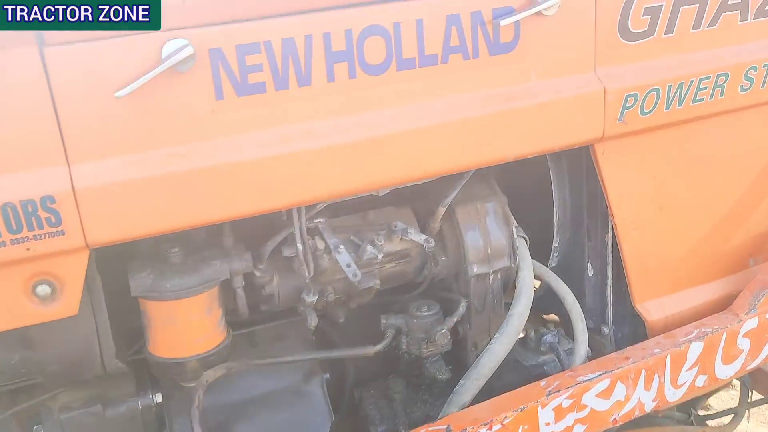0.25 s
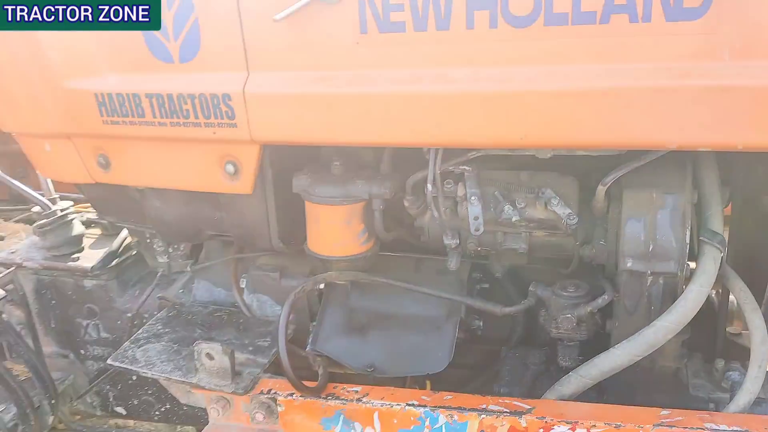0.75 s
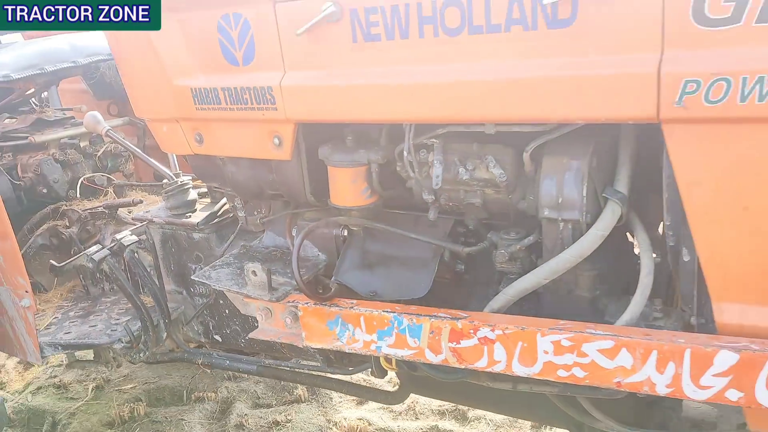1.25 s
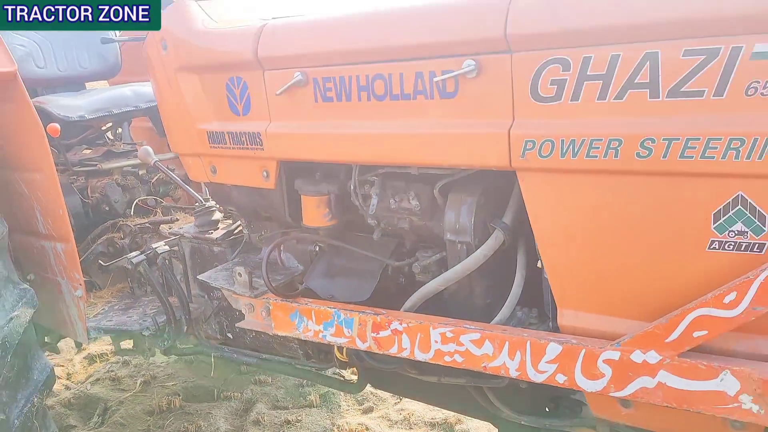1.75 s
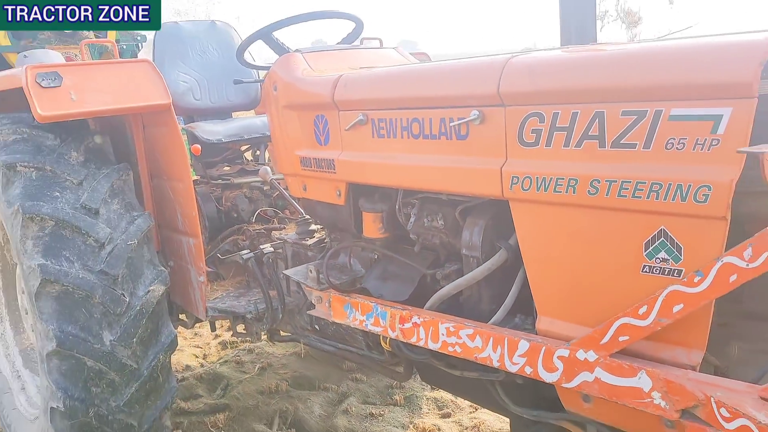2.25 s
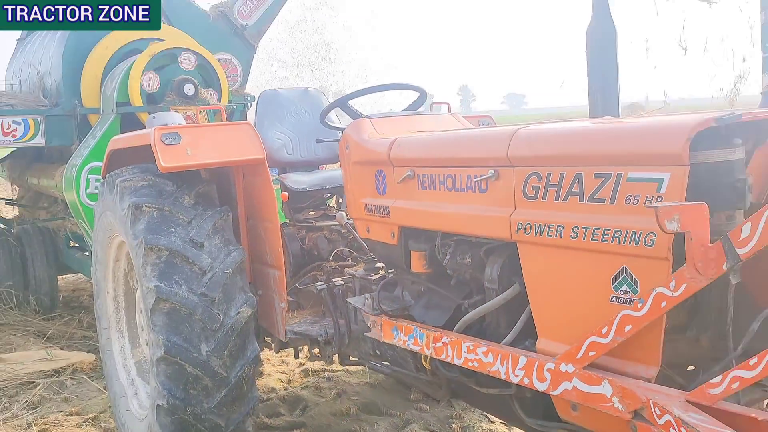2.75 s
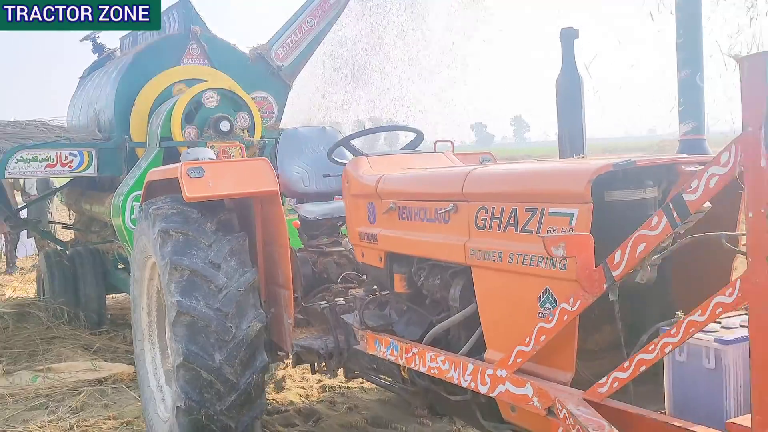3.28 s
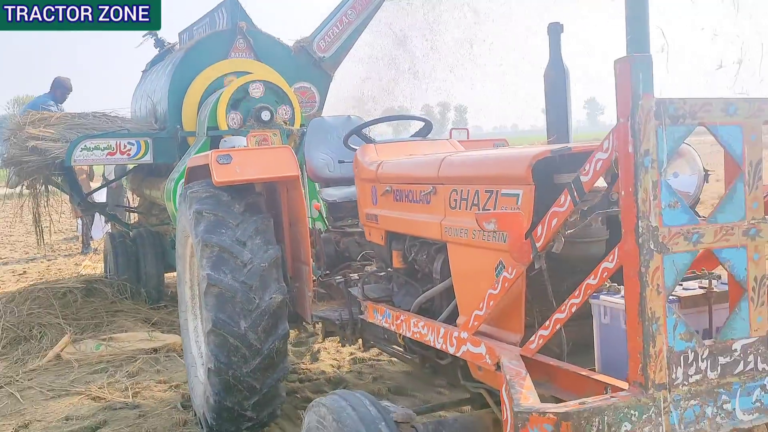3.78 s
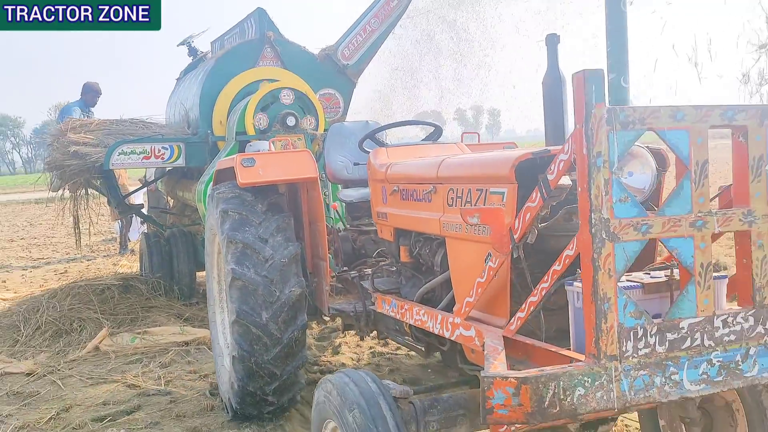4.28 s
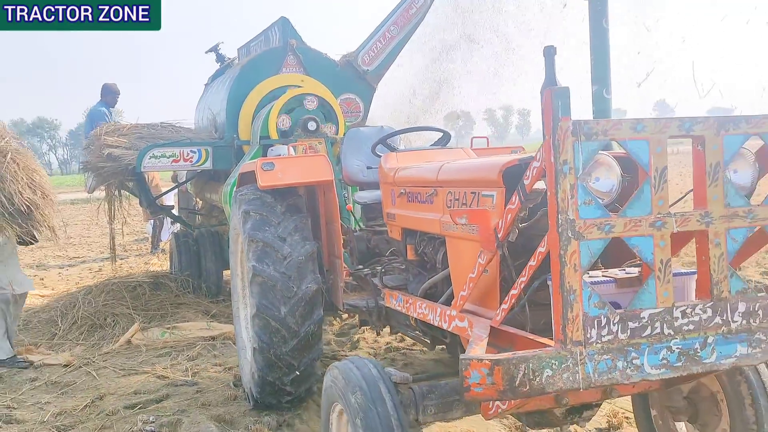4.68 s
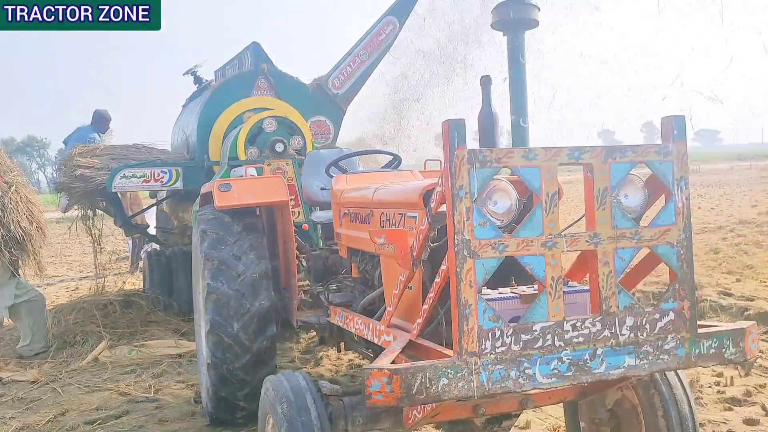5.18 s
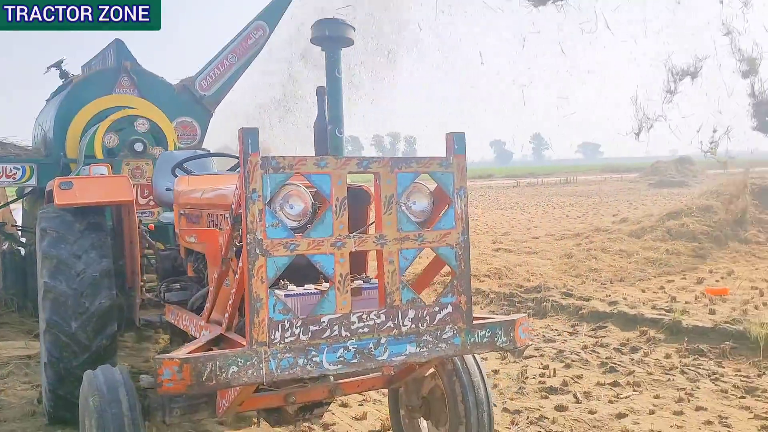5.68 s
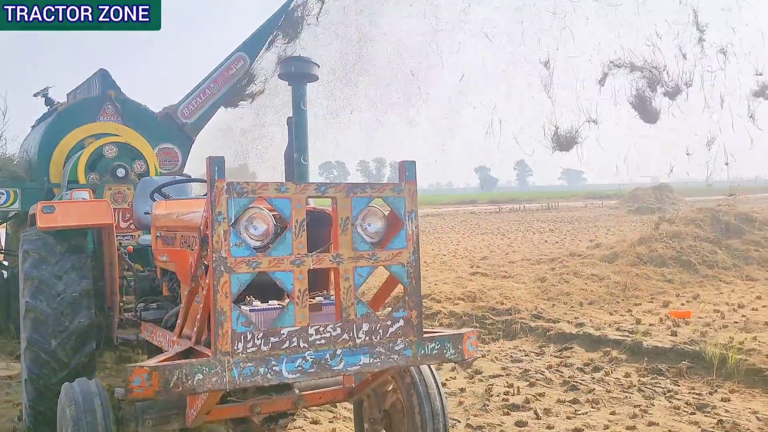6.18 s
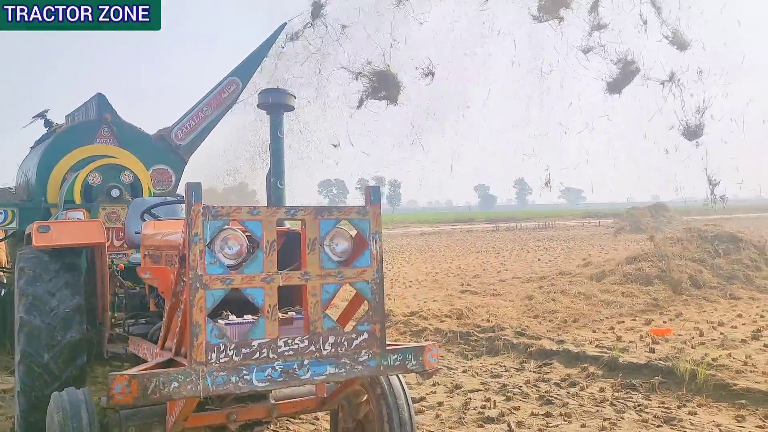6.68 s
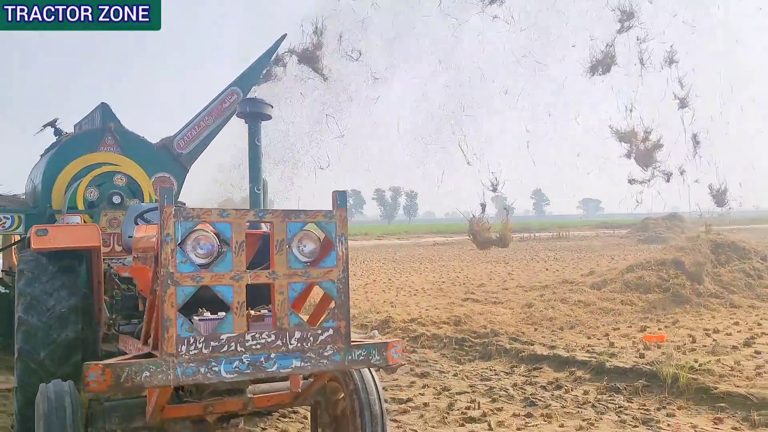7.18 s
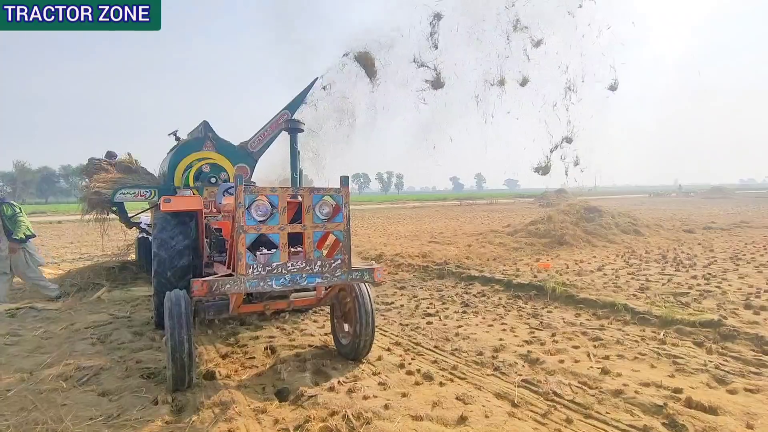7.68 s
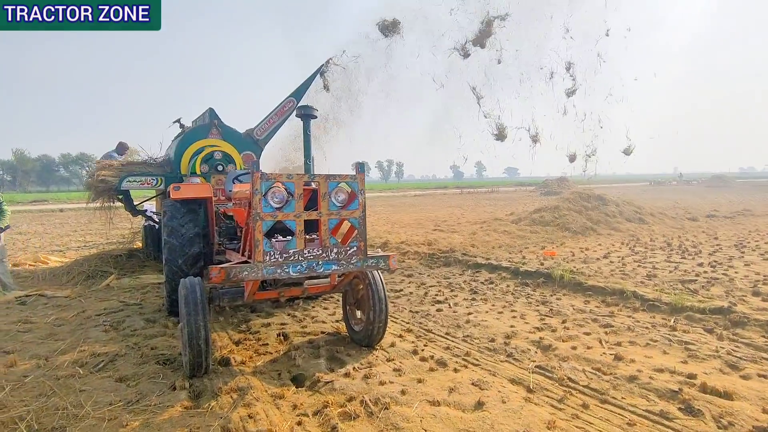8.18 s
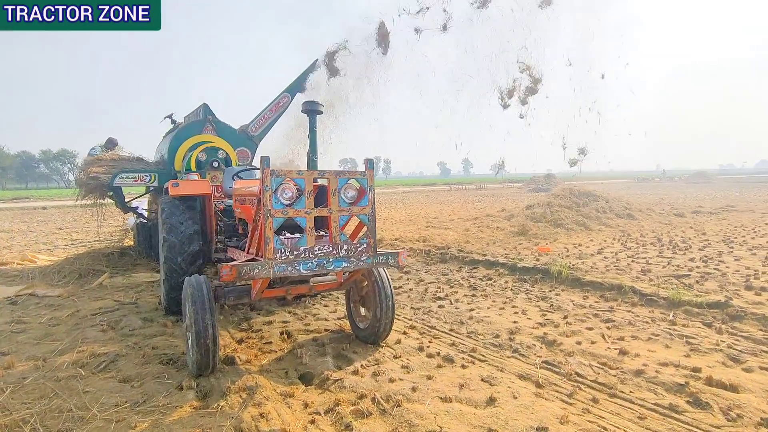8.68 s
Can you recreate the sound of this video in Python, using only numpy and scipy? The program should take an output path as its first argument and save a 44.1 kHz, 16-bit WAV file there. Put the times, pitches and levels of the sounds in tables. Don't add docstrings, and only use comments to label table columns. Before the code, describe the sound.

From 0 s a tractor diesel runs at full work, very close to the two-port microphone: a dense throb of about 59 firings a second, with block knock, rattling valve gear and crisp injector ticking. Behind it a belt-driven thresher gives a patchy, broadband rush of straw and air with a steady blower hum. Over 0.5-2.6 s the listener steps back along the side and the near engine tone changes; small dips come near 2.2 and 3.35 s. Around 4.1 s the engine bites harder and begins to labour. From 5 to 7 s, rounding the front, pitch drops to about 52, treble dulls, bonnet ringing increases and stray hard knocks stand out. It falters near 7.4 s, surges at 8.5 s with brighter ticking and a short low gust, and continues near 50 to the end at 8.9 s. Faint wind, open field, no evident echo.

```python
import sys
import numpy as np
from scipy import signal
from scipy.fft import rfft, irfft, next_fast_len
from scipy.io import wavfile
from scipy.ndimage import uniform_filter1d, map_coordinates

SR = 44100
rng = np.random.default_rng(int(sys.argv[2]) if len(sys.argv) > 2 else 0)


def decibels_to_gain(level_db):
    exponent = np.asarray(level_db, float) / 20
    return 10 ** exponent


def bounce(signal):
    frames = np.transpose(np.atleast_2d(signal))
    limited = np.clip(frames, -1, 1)
    pcm = np.round(limited * 32767).astype(np.int16)
    wavfile.write(sys.argv[1], SR, pcm)


N = 394254
T = np.arange(N) / SR


def along(points, hz):
    f, v = np.transpose(points)
    return np.interp(np.log(hz + 1), np.log(f + 1), v)


def curves(rows, t=T):
    s, *columns = np.transpose(rows)
    return [np.interp(t, s, column) for column in columns]


def bumps(rows):
    return sum(db * np.exp(-((T - s) / half_s) ** 2) for s, db, half_s in rows)


def unit(x):
    return x / np.sqrt(np.mean(x ** 2) + 1e-20)


def wobble(rate):
    coarse = np.arange(0, N + 64, 64)
    knots = rng.standard_normal(int(N * rate / SR) + 4)
    return np.interp(np.arange(N), coarse, map_coordinates(knots, [coarse * rate / SR]))


def filtered(x, response):
    m = next_fast_len(N + 8192)
    return irfft(rfft(x, m) * response(np.fft.rfftfreq(m, 1 / SR)), m)[..., :N]


def ringing(x, modes):
    def body(hz):
        total = 0
        for k, (centre, width, db) in enumerate(modes):
            damping = 1j * hz * width
            total = total + (-1) ** k * decibels_to_gain(db) * damping / (centre * centre - hz * hz + damping)
        return total
    return unit(filtered(x, body))


# time in seconds, left port lag in ms, ports alike up to this
# frequency in Hz, frontness 0-1, blur of the nearby moving parts (a factor, larger when close).
LISTENER_PATH = [(0, 0.11, 680, 0.7, 4.9), (.4, 0.047, 940, .2, 4.9), (.7, -0.11, 1120, 0.2, 3.1),
                 (1.5, -0.1, 1310, .05, 2.3), (2.4, -0.12, 1540, 0, 1.8), (3.6, -0.095, 2140, 0, 1.5),
                 (4.8, -0.1, 2420, 0, 0.77), (5.5, 0.071, 2600, 0.1, 0.57), (6.2, 0.043, 2840, 0.83, 0.7),
                 (7.3, 0.071, 3020, 0.34, 0.68), (8.94, 0.067, 3120, 0.6, 0.49)]


def walk(t=T):
    return curves(LISTENER_PATH, t)


PLACE_TIMES = [.8, 2.8, 4.6, 6.6]


def at_places(levels_db):
    return np.interp(T, PLACE_TIMES, levels_db)


# time in seconds, firing rate in Hz.
FIRING_RATE = [(0.0, 59.09), (0.5, 58.17), (1.05, 57.53), (1.7, 57.85), (2.1, 58.35), (2.5, 57.96),
               (3.2, 58.02), (3.85, 58.44), (4.55, 55.87), (4.9, 55.46), (5.3, 55.39), (5.6, 54.9),
               (5.95, 52.96), (6.3, 52.17), (6.65, 52.03), (7.1, 51.07), (8.4, 50.4), (8.94, 50.01)]


def firing_rate():
    return curves(FIRING_RATE)[0]


def firings():
    return np.cumsum(firing_rate()) / SR + 3 - .13


# time in seconds, effort in dB.
GOVERNOR = [(0, 2), (.35, 0), (.8, -1), (2.3, -.7), (2.6, .6), (3.3, .8), (4.0, 1.5), (4.15, 4.2),
            (4.8, 4.3), (5.5, 3.5), (6.3, 5), (6.9, 3.3), (7.8, 3.6), (8.94, 3.5)]


def effort():
    return curves(GOVERNOR)[0]


# time in seconds, change in dB, half length in seconds.
FEED_LURCHES = [(.85, -0.5, 0.083), (2.2, -1.5, .04), (3.35, -2.5, 0.025), (3.97, -0.5, .04),
                (4.15, 1, .05), (5.6, -2, 0.014), (6.2, -1.5, 0.018), (6.85, -1.5, 0.098),
                (7.1, 0.5, 0.039), (7.42, -2.5, .05), (8.17, -1, 0.052), (8.48, 2, 0.056), (8.6, -1, 0.038)]


def lurches():
    return bumps(FEED_LURCHES)


# frequency in Hz, level in dB.
LOW_TURBULENCE = [(12, -29), (22, -7.5), (32, -12.5), (55, 0), (90, -3), (160, -2.5), (230, -6.5),
                  (320, -9), (450, -21.5), (800, -55.5)]


def turbulence():
    return unit(filtered(rng.standard_normal((2, N)), lambda hz: decibels_to_gain(along(LOW_TURBULENCE, hz))))


def wind():
    return decibels_to_gain(-38 + 1.5 * wobble(3)) * turbulence()


# frequency in Hz, density in dB per Hz.
RUSH_SPECTRUM = [(150, -33), (300, -5), (500, -15), (750, -8), (1100, -11.5), (1500, -12), (2550, -15),
                 (3400, -18.5), (4800, -21), (5600, -18), (7000, -13.5), (8000, -22), (9000, -59)]
# time in seconds, rise in dB, half length in seconds.
RUMBLE_GUSTS = [
    (6.15, -1.5, 0.34),
    (7.4, 0.5, .2),
    (8.57, 7, .08),
    (8.9, 0.5, 0.14),
]


def thresher():
    z = signal.stft(rng.standard_normal((2, N)), nperseg=512)[2]
    field = uniform_filter1d(rng.standard_normal(z.shape[1:]), size=6, axis=0)
    field = uniform_filter1d(field, size=12, axis=1)
    patchy = signal.istft(z * decibels_to_gain(2.0 * unit(field)), nperseg=512)[1][:, :N]
    rush = unit(filtered(patchy, lambda hz: decibels_to_gain(along(RUSH_SPECTRUM, hz))))
    rumble_db = -28 + bumps(RUMBLE_GUSTS) + 1.5 * wobble(6)
    return decibels_to_gain(-28 + .6 * wobble(2)) * rush + decibels_to_gain(rumble_db) * turbulence()


# multiple of the firing rate, then level in dB heard at each of the four places.
BLADE_TONES = [(1.165, -46, -39, -41, -43), (2.863, -37, -30, -30, -33), (3.7, -44, -38, -39, -40),
               (5.726, -46, -44, -40, -44)]


def blower():
    turn, out = 2 * np.pi * firings(), np.zeros(N)
    for multiple, *db in BLADE_TONES:
        level = np.sqrt(2) * decibels_to_gain(at_places(db) + wobble(6))
        out += level * np.cos(multiple * turn + .1 * wobble(5))
    return out


# time in seconds, closeness 0-1.
CLOSENESS = [
    (.45, 1),
    (1.0, 0.64),
    (1.7, 0.34),
    (2.6, 0.1),
]
# order, level in dB at free speed, level in dB when dragged down,
# share of the effort 0-1, change in dB right beside the block.
MAIN_ORDERS = [(1, -20.1, -20.1, 1, 0), (2, -20.8, -19.5, .2, 4.8), (3, -18.2, -26.5, .3, -3.5),
               (4, -23.3, -29, .15, -20)]


def pipe():
    free_hz, dragged_hz = 58, 52.3
    drag = np.clip((free_hz - firing_rate()) / (free_hz - dragged_hz), 0, 1)
    effort_db, close, lurch_db = effort(), curves(CLOSENESS)[0], lurches()
    levels = []
    for order, free, dragged, share, near in MAIN_ORDERS:
        db = free + (dragged - free) * drag + share * effort_db
        levels.append((order, db + near * close ** (order - 1) + lurch_db / 2))
    return levels


# multiple of the firing rate, then level in dB heard at each of the four places.
WEAK_ORDERS = [(0.667, -43, -43, -47, -45), (1.333, -44, -44, -41, -37), (2.333, -40, -39, -45, -38),
               (2.667, -36, -50, -50, -50), (3.333, -36, -33, -38, -46), (3.667, -33, -34, -38, -42),
               (4.333, -37, -39, -37, -50), (5.0, -30, -40, -31, -29), (5.333, -46, -38, -37, -45),
               (5.667, -38, -39, -42, -38), (6.0, -35, -37, -36, -33), (6.333, -45, -37, -39, -47),
               (6.667, -39, -39, -44, -41), (7.0, -44, -40, -46, -47), (9.667, -50, -50, -45, -40),
               (10.0, -50, -39, -44, -50), (12.0, -38, -40, -41, -43), (12.667, -48, -43, -41, -35),
               (13.0, -41, -41, -38, -40), (14.0, -37, -38, -35, -50), (15.0, -38, -38, -42, -46),
               (15.667, -46, -38, -50, -44), (16.0, -48, -40, -38, -43), (17.333, -40, -40, -44, -36)]


def exhaust():
    turn, front = 2 * np.pi * firings(), walk()[2]
    weaker = [(multiple, at_places(db)) for multiple, *db in WEAK_ORDERS]
    out = np.zeros(N)
    for multiple, db in [*pipe(), *weaker]:
        order = round(3 * multiple) / 3
        from_front = (.2 + .9 * front) / order ** 3
        side_delay = 1.6 * (1 - front) * min(order / 4, 1.3) ** 3
        shift = from_front - side_delay
        if order % 1 or order > 7:
            shift = rng.uniform(0, 2 * np.pi)
        unsteady = min(order, 5)
        level = np.sqrt(2) * decibels_to_gain(db + (.16 + .26 * front) * unsteady * wobble(14))
        jitter = (.02 + .025 * front) * unsteady * wobble(9)
        out += level * np.cos(order * turn + shift + jitter)
    return out


def repeating(change):
    rows, cycle = np.arange(N) * change / SR, 2300
    table = rng.standard_normal((2, int(rows[-1]) + 2, cycle + 1))
    where = [rows, firings() / 3 % 1 * cycle]
    return unit(np.array([map_coordinates(page, where, order=1) for page in table]))


def bursts(accent, late, rise, fall, scatter_db, steady):
    count = firings() - late
    which, u = count.astype(int), count % 1
    front, blur = walk()[2:]
    size = decibels_to_gain(accent + scatter_db * rng.standard_normal(len(accent)))
    decay = np.exp(-u / (fall * (1 - 0.29 * front)))
    gate = size[which] * (1 - np.exp(-u / rise)) ** 2 * decay
    gate = gate / uniform_filter1d(gate, size=SR) + steady * blur
    return gate / np.sqrt(np.abs(uniform_filter1d(gate ** 2, size=SR)))


def raps(accent, late, jitter_ms, scatter_db):
    count, out = firings() - late, np.zeros((2, N + SR))
    which = np.arange(int(count[0]) + 1, int(count[-1]))
    for row in out:
        for delay_ms, db in [(0, -2.5), (1.3, -6.5)]:
            chance = rng.standard_normal((len(which), 2))
            at = np.searchsorted(count, which) + (delay_ms + jitter_ms * chance[:, 0]) * SR / 1000
            blow = decibels_to_gain(accent[which] + db + scatter_db * chance[:, 1])
            np.add.at(row, np.abs(at).astype(int), blow)
    return out[:, :N]


CYLINDER_KNOCK = [.9, -.3, -.6]
# time in seconds, extra level in dB.
HARD_FIRINGS = [(5.263, 4), (5.444, 3), (5.792, 4), (5.94, 4), (7.389, 5), (7.744, 4), (7.9, 4), (8.275, 4),
                (8.613, 4), (8.654, 1), (8.673, 2)]


def firing_accents():
    count = firings()
    total = int(count[-1]) + 2
    accent = np.resize(CYLINDER_KNOCK, total) + .8 * rng.standard_normal(total)
    for s, extra_db in HARD_FIRINGS:
        accent[int(count[round(s * SR)] + .3)] += extra_db
    return accent


# frequency in Hz, width in Hz, level in dB.
INJECTOR_MODES = [(5420, 4300, -13), (6820, 950, 6.5), (7800, 540, 5)]
# time in seconds, level in dB.
INJECTOR_FACING = [(0, -0.5), (1.3, -1), (1.6, -3.5), (2.1, -1), (2.8, -0.5), (3.7, -.5), (3.95, -4.5),
                   (4.1, -0.5), (4.7, 0.5), (5.05, -5), (5.35, -2.5), (5.7, -6.5), (7.1, -5), (8.3, -3.5),
                   (8.45, 0.5), (8.94, -2.5)]


def facing():
    return curves(INJECTOR_FACING)[0]


def injector_tick(accent):
    tick_db = -32 + 1.3 * facing() + 1.6 * lurches() + .9 * wobble(7)
    gate = bursts(accent, late=-.05, rise=.22, fall=.15, scatter_db=1.1, steady=.9)
    return decibels_to_gain(tick_db + 4.5) * ringing(gate * rng.standard_normal((2, N)), INJECTOR_MODES)


# frequency in Hz, width in Hz, level in dB.
VALVE_MODES = [(2150, 310, -3), (3040, 360, -1.5), (3400, 340, 2), (4150, 3000, -10.5)]
# time in seconds, rise in dB, half length in seconds.
VALVE_PASSES = [
    (3.6, 2.5, .7),
    (5.9, 2, 1.1),
]


def valve_clatter(accent, locked):
    valve_db = -36 + bumps(VALVE_PASSES) + .25 * effort() + 1.6 * lurches() + 0.21 * facing() + wobble(5)
    gate = bursts(accent, late=0, rise=.12, fall=0.23, scatter_db=1.5, steady=1.0)
    strikes = gate * (0.31 * locked + 0.99 * rng.standard_normal((2, N)))
    return decibels_to_gain(valve_db + 3.5) * ringing(strikes, VALVE_MODES)


# frequency in Hz, width in Hz, level in dB.
BONNET_MODES = [(860, 190, -1), (1330, 210, -2), (1780, 150, 4), (2090, 360, -11), (3050, 370, -9)]


def bonnet_ping(accent, knock_db):
    blows = raps(accent, late=.14, jitter_ms=.25, scatter_db=1.1)
    return decibels_to_gain(knock_db - 14 + 6.5 * walk()[2]) * ringing(blows, BONNET_MODES)


# frequency in Hz, width in Hz, level in dB.
BLOCK_MODES = [(336, 230, -3.5), (679, 108, 3), (784, 125, 3.5), (883, 98, 4), (980, 101, 1),
               (1354, 293, 0), (1683, 700, -9)]


def combustion_knock(accent, locked, knock_db):
    blow = .7 * locked + .7 * rng.standard_normal((2, N))
    gate = bursts(accent / 2, late=0.0074, rise=0.021, fall=0.26, scatter_db=1, steady=3.0)
    return decibels_to_gain(knock_db - 3.5) * ringing(gate * blow, BLOCK_MODES)


def clatter():
    knock_db = -19 + 0.12 * effort() + 1.4 * lurches() + 0.73 * wobble(7)
    accent, locked = firing_accents(), repeating(change=2.2)
    block = combustion_knock(accent, locked, knock_db) + bonnet_ping(accent, knock_db)
    return block + valve_clatter(accent, locked) + injector_tick(accent)


# frequency in Hz, left minus right in dB.
PORT_DIFFERENCE = [(60, -.4), (900, -.4), (1300, -1), (1900, -2), (2300, 1), (2800, 7), (3400, 9),
                   (4300, 7), (5500, 3), (6600, 5), (7400, 3), (8000, -1)]


def ports(shared, differing):
    hz, t, z = signal.stft(np.array([shared, differing]), SR, nperseg=256)
    lag_ms, alike_hz, *_ = walk(t)
    hz = hz[:, None]
    treble_alike = np.clip(0.57 * (hz / 8000) ** 14, 0, .95)
    coherence = np.maximum(1 / (1 + (hz / alike_hz) ** 2), treble_alike)
    angle = np.arccos(coherence) / 2
    half = np.exp(-1j * np.pi * hz * lag_ms / 1000) * decibels_to_gain(along(PORT_DIFFERENCE, hz) / 2)
    mid, side = np.cos(angle) * z[0], np.sin(angle) * z[1]
    pair = np.array([(mid + side) * half, (mid - side) / half])
    return signal.istft(pair, SR, nperseg=256)[1][:, :N]


def scene():
    shared, differing = clatter() + thresher()
    return ports(shared + exhaust() + blower(), differing) + wind()


def low_pass(x):
    return signal.sosfilt(signal.butter(12, 8990, fs=SR, output="sos"), x)


def record(dry):
    x = dry / (1 + np.abs(dry / .98) ** 6) ** (1 / 6)
    mix = filtered(x, lambda hz: 1 / (1 + (hz / 7760) ** 85))
    return low_pass(mix)


dry = scene()
out = record(dry)
bounce(out)
```